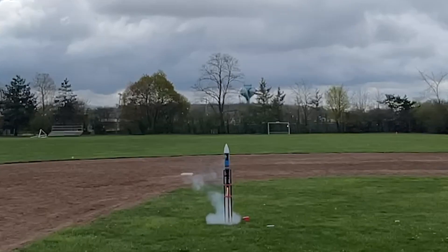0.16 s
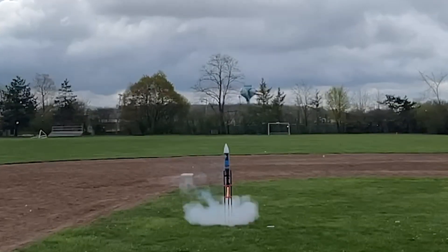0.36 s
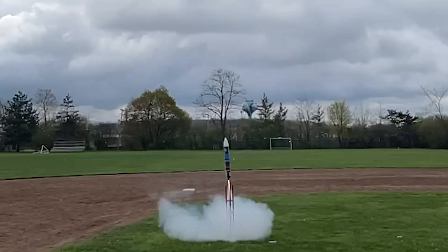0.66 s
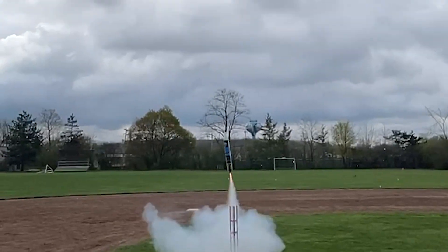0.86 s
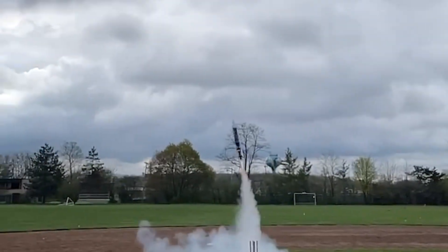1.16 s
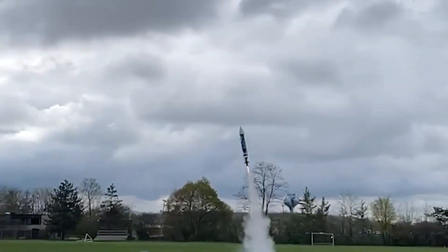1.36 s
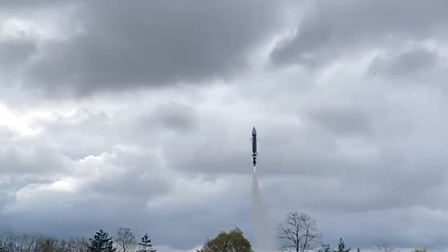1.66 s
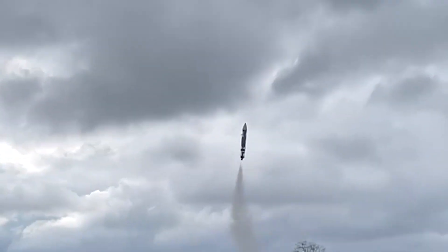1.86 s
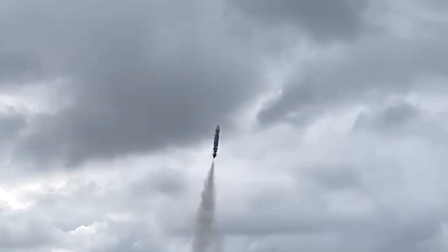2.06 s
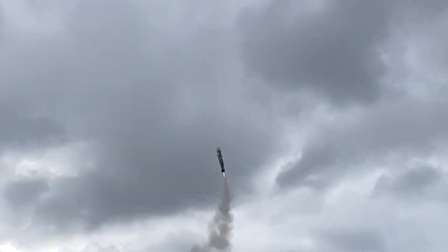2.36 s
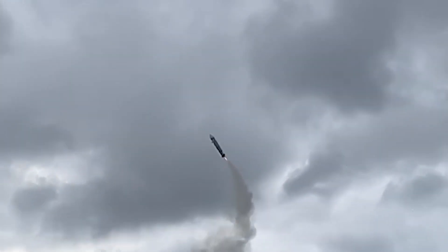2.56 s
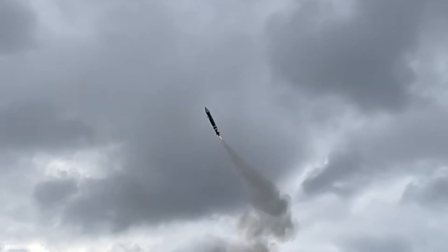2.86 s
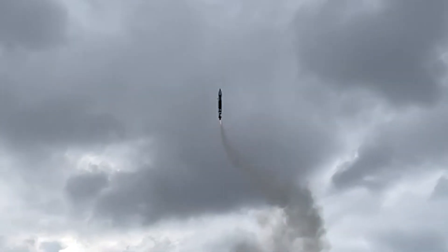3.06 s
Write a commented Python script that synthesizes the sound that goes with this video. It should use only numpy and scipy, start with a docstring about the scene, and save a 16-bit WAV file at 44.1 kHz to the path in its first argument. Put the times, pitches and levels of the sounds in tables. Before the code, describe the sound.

A small solid-fuel rocket lights with a fierce rushing hiss on a grass field, drops back as it lifts off, swells again overhead with sharp crackling pops, then fades; handheld stereo camera, faint low wind rumble.

```python
"""A small solid-fuel rocket lights on its pad in an open field, roars up and burns out overhead.
The jet is turbulent hiss, shaped in bands, over shared crackle; uneven burning adds sharp pops.
The grass sends back a dull echo whose lag grows from under a millisecond to about six.
Wind noise rumbles on the two microphone ports of a handheld camera; a few low thuds,
some of them the bass tails of pops, sound alike on both."""
import sys
import numpy as np
from scipy import signal
from scipy.fft import rfft, irfft
from scipy.io import wavfile
from scipy.ndimage import uniform_filter1d

SR = 44100
rng = np.random.default_rng(int(sys.argv[2]) if len(sys.argv) > 2 else 0)


def put_to_file(sound):
    """Save the sound as 16-bit audio at rate SR, in the file named by the first command-line argument."""
    columns = np.atleast_2d(sound).T  # one column per channel
    safe = np.clip(columns, -1, 1)
    whole_steps = np.round(safe * 32767)
    wavfile.write(sys.argv[1], SR, whole_steps.astype(np.int16))


def gain_from_db(level_db):
    """Convert decibel levels to linear amplitude factors (20 dB per decade)."""
    decades = np.asarray(level_db, float) / 20
    return 10 ** decades


N = 141120  # samples
T = np.arange(N) / SR  # s
HZ = np.fft.rfftfreq(512, 1 / SR)  # bins of the short-time spectra


def evened(x):
    """Scales to rms 1."""
    return x / np.sqrt(np.mean(x ** 2) + 1e-20)


def read(points, hz):
    """Reads a table on a log-frequency axis."""
    f, value = np.transpose(points)
    return np.interp(np.log(hz + 1), np.log(f + 1), value)


def frames(x):
    """Frame times and short-time spectra."""
    return signal.stft(x, SR, nperseg=512, noverlap=384)[1:]


def sound(z):
    """Back from short-time spectra to samples."""
    return signal.istft(z, SR, nperseg=512, noverlap=384)[1][..., :N]


def drift(hz):
    """Random wander with rms 1, up to about hz."""
    spectrum = rfft(rng.standard_normal(N))
    return evened(irfft(spectrum / (1 + (np.fft.rfftfreq(N, 1 / SR) / hz) ** 2), N))


def band(x, low_hz, high_hz):
    """Gentle band-pass."""
    return signal.sosfilt(signal.butter(2, [low_hz, high_hz], "band", fs=SR, output="sos"), x)


def wind():
    """Light wind on the ports: a lumpy low band of noise, mostly shared by the two."""
    # strength of the wind rumble: (time [s], level [dB])
    strength = [(0, -63), (.06, -54), (.22, -59), (.42, -71), (.95, -82), (1.8, -80), (2.04, -65),
                (2.5, -70), (3.2, -78)]
    low_hz, high_hz = 45, 95
    lumpy_db = 2.5  # rms of the level wander
    same = .93  # likeness of the two ports
    noise = band(rng.standard_normal((2, N)), low_hz, high_hz)
    a, b = band(noise, low_hz / 2, 2 * high_hz)
    pair = np.array([a, same * a + np.sqrt(1 - same ** 2) * b])
    rumble = evened(gain_from_db(lumpy_db * drift(26.0)) * pair)
    return rumble * gain_from_db(np.interp(T, *np.transpose(strength)))


def thuds():
    """Dull low thuds, some the bass tails of pops, alike on both ports: a tone that swells and dies away."""
    # thuds: (time [s], peak level of the envelope [dB])
    hits = [(0.046, -46.5), (1.07, -58), (2.597, -49), (2.634, -54), (3.006, -51), (3.157, -58),
            (3.18, -52)]
    rise_s, tone_hz = .006, 150
    out = np.zeros(N)
    for s, db in hits:
        u = np.maximum(T - s, 0)
        envelope = u / rise_s * np.exp(1 - u / rise_s)
        out += gain_from_db(db) * envelope * np.sin(2 * np.pi * tone_hz * u)
    return out


def ground(x):
    """Adds the dull echo off the grass, whose extra path changes as the rocket climbs."""
    # extra path by way of the ground, smoothed below: (time [s], lag [ms])
    path = [(0, 0.72), (.55, 0.63), (.95, 1.34), (1.42, 2.49), (1.65, 3.13), (2.0, 4.03), (2.3, 4.84),
            (2.58, 5.87), (2.93, 5.84), (3.2, 6.1)]
    grass_db, grass_hz = -5, 2200  # echo level, and corner of its treble loss
    s, ms = np.transpose(path)
    lag_ms = uniform_filter1d(np.interp(T, s, ms), size=4000)
    late = np.arange(N) - lag_ms * SR / 1000
    dull = signal.filtfilt(*signal.butter(1, grass_hz, fs=SR), x)
    return x + gain_from_db(grass_db) * np.array([np.interp(late, np.arange(N), v) for v in dull])


def ports(pair):
    """The camera turns the arriving sound into left and right, by body colour, phase, likeness and balance."""
    # likeness of the two ports: (frequency [Hz], likeness [0 to 1])
    likeness = [(60, .97), (1000, .96), (1300, .995), (1950, .995), (2300, .7), (4500, .7), (4800, .92),
                (7000, .84), (8300, .995), (10200, .995), (10800, .9), (12500, .87)]
    # left minus right with the rocket low and high: (frequency [Hz], level difference [dB])
    side_low = [(60, -9), (250, 6.5), (400, -9), (560, 4.5), (950, -7), (1250, -0.5), (2000, 0), (2200, 13),
                (2400, 0), (2900, -6.5), (3100, 54), (3400, 10), (3750, -7), (4600, 4), (5600, 4),
                (7000, 0)]
    side_high = [(60, 4), (250, 5), (400, -2.5), (560, 5), (900, -10), (1300, 2), (2400, -7), (2750, 11.5),
                 (3400, -8), (4000, -7.5), (4400, -13), (4600, -0.5), (8000, 0.5)]
    # pickup of the camera body with the rocket low and high: (frequency [Hz], gain [dB])
    body_low = [(100, -10.5), (170, 3.5), (250, 4), (370, -8.5), (700, 4), (1100, 1.5), (1550, 1),
                (1850, 0), (2300, -2), (2700, 1), (2950, 0), (3500, -2), (4050, -0.5), (4250, 4.5),
                (4600, -6.5), (5000, -1.5)]
    body_high = [(200, -1), (380, -7), (550, -3), (1500, -1), (2100, -1), (2550, 3.5), (3120, -1.5),
                 (3300, 1.5), (3550, -4), (3950, 1.5), (4550, 2), (5200, -2.5)]
    # right minus left with the rocket low and high: (frequency [Hz], phase [rad])
    turn_low = [(60, 0), (350, .9), (450, .2), (700, 1), (1250, 0), (2000, 0), (2250, 1.4), (2450, .6),
                (3000, 2.8), (3550, 6.3), (4000, 5.2), (4350, 7), (4650, 6.3)]
    turn_high = [(60, 0), (350, .5), (450, .3), (750, 1.1), (950, 0), (2150, 0), (2600, 2.6), (3050, 1),
                 (3400, 2.8), (3650, 6), (4050, 7), (4400, 9.4), (4700, 12.1)]
    lift_s, swing_s = .75, 1.9  # the direction moves from low to high between these times
    port_lag_s = .0001085
    t, (a, b) = frames(pair)
    same = np.clip(read(likeness, HZ), 0, 1)[:, None]
    up = np.clip((t - lift_s) / (swing_s - lift_s), 0, 1)

    def blend(low, high):
        """Moves from the low-rocket table to the high one."""
        return np.outer(read(low, HZ), 1 - up) + np.outer(read(high, HZ), up)

    # above the last row of turn_low the right port is inverted and late
    inverted_late = np.pi - 2 * np.pi * HZ[:, None] * port_lag_s
    turn = np.where(HZ[:, None] < turn_low[-1][0], blend(turn_low, turn_high), inverted_late)
    lean = gain_from_db(blend(side_low, side_high) / 2)
    # the balance leaves the mean power of the two gains alone
    balance = np.array([lean, 1 / lean]) / np.sqrt((lean ** 2 + lean ** -2) / 2)
    right = (same * a + np.sqrt(1 - same ** 2) * b) * np.exp(1j * turn)
    return sound(gain_from_db(blend(body_low, body_high)) * balance * np.array([a, right]))


def pops():
    """Uneven burning: each pop is a suction and pressure jump with its bass trailing; longer ones are duller."""
    # pops at the source: (time [s], peak level [dB], time scale [ms])
    bursts = [(.227, -26, .1), (1.069, -36, .12), (1.191, -37, .3), (2.0156, -27, .35), (2.122, -26, .11),
              (2.443, -19, .075), (2.476, -24, .1), (2.507, -28.5, .25), (2.596, -35, .2), (2.63, -29, .22),
              (2.684, -35, .08), (2.85, -38, .35), (2.857, -35, .12), (2.941, -34, .2), (2.987, -37, .14),
              (3.005, -36, .13)]
    low_hz, high_hz, trail_cycles = 140, 3000, .9
    length = 900  # samples
    out = np.zeros(N + length)
    hz = np.maximum(np.fft.rfftfreq(length, 1 / SR) / high_hz, 1e-2)  # relative to high_hz
    # delays low frequencies by about trail_cycles of their own period
    trail = np.exp(-2j * np.pi * trail_cycles * (np.log(hz) - hz))
    for s, db, ms in bursts:
        u = np.arange(length) / SR / ms * 1000
        jump = band((u - 1) * np.exp(-u), low_hz, high_hz)
        jump = band(jump, low_hz, 2 * high_hz)
        shape = irfft(rfft(jump) * trail, length)
        out[round(s * SR):][:length] += gain_from_db(db) * shape / abs(shape).max()
    return out[:N]


def jet():
    """Two unrelated draws of turbulence over shared crackle, shaped by colour, band levels and patches."""
    # jet as the nozzle swings, before echo and ports: (time [s], level [dB], then each band
    # against that level: low roar [dB], roar [dB], rush [dB], hiss [dB], sizzle [dB])
    course = [(0, -54, 1, -4.5, -1, -2.5, -13), (.13, -37.5, -14.5, -6, -3.5, -1, -6),
              (.24, -29.5, -15.5, -5, -5, -1, -4.5), (.36, -28.5, -19.5, -7.5, -4.5, -3, -6.5),
              (.53, -34, -15, -7.5, -1, 2, -5), (.58, -31, -18, -7, -7, -2.5, 0.5),
              (.63, -29, -23.5, -13.5, -6.5, 1.5, -14), (.642, -37.5, -16, -7, -2.5, 3.5, -6),
              (.69, -42, -11.5, -5.5, 1.5, 3.5, -3.5), (.8, -42, -15.5, -7, -3.5, -3.5, -4.5),
              (1.2, -41, -13.5, -6.5, -4, -2.5, -2.5), (1.58, -39.5, -15, -7, -3.5, -3.5, -4),
              (1.91, -34.5, -18, -11, -5, -2.5, 0.5), (2.05, -32, -18, -12.5, -3, -2, -1.5),
              (2.2, -31, -20.5, -9, -4, -1, -6), (2.33, -30.5, -20.5, -7.5, -2, -6, -11),
              (2.47, -31.5, -14.5, -5, -2, -5.5, -11), (2.56, -37.5, -14, -3, 0, -4.5, -6.5),
              (2.83, -35.5, -22, -8.5, -2, -0.5, -4), (2.9, -39, -22, -10.5, -3, -0.5, -2),
              (2.96, -45, -10.5, -11, -2, 0, -2.5), (3.06, -48.5, -12, -5, -5.5, -3, -6),
              (3.2, -49.5, -11, -5, -5, -8, -5)]
    # the five bands: (low edge [Hz], high edge [Hz])
    bands = [(250, 1000), (1000, 2500), (2500, 4500), (4500, 8000), (10000, 16000)]
    # colour of the jet: (frequency [Hz], spectral density [dB per Hz]), then set band by band to the levels
    tint = [(30, -52), (100, -18), (300, -12.5), (600, -5.5), (1000, -8), (1600, -2.5), (2700, -1.5),
            (4600, -4), (5600, 1), (7500, -4.5), (9700, -8.5), (11500, -3.5), (13200, -13.5),
            (16000, -18.5)]
    crackle_per_s, crackle_spread_db, crackle_db = 300, 4.0, -15  # crackle_db: rms against the hiss
    flutter_db, flutter_hz = .8, 135.0
    surge_db, surge_hz, pad_s = .7, 22, .62  # the blast surges while it still hits the pad
    patchy_db = 1.3  # rms of the patches in time and frequency

    strength = gain_from_db(crackle_spread_db * np.minimum(rng.exponential(1, N), 4))
    crackle = strength * (rng.random(N) < crackle_per_s / SR)
    flutter = flutter_db * drift(flutter_hz)
    surge = surge_db * (T < pad_s) * drift(surge_hz)
    gusts = gain_from_db(flutter + surge)
    gusts = gusts / np.sqrt(np.mean(gusts ** 2))
    hiss = rng.standard_normal((2, N))
    t, z = frames(gusts * (hiss + gain_from_db(crackle_db) * evened(crackle)))

    rows, colour = np.array(course), gain_from_db(read(tint, HZ))
    levels, centres = [], []
    for k, (lo, hi) in enumerate(bands):
        share = 10 * np.log10(np.mean(colour ** 2 * (HZ > lo) * (HZ < hi)))  # what the colour alone gives
        levels.append(np.interp(t, rows[:, 0], rows[:, 1] + rows[:, 2 + k]) - share)
        centres.append(np.sqrt(lo * hi))
    # each frequency bin blends the levels of its neighbouring bands
    weights = np.array([read(list(zip(centres, one)), HZ) for one in np.eye(len(bands))])
    patches = uniform_filter1d(rng.standard_normal(z.shape[1:]), size=6, axis=0)
    patches = evened(uniform_filter1d(patches, size=20, axis=1))
    return sound(z * colour[:, None] * gain_from_db(weights.T @ np.array(levels) + patchy_db * patches))


def scene():
    """Jet and pops over the grass into the ports, plus wind and thuds."""
    return ports(ground(jet() + pops())) + wind() + thuds()


def top_cut(x):
    """Nothing passes above the cut-off."""
    return signal.sosfilt(signal.butter(12, 16480, fs=SR, output="sos"), x)


def record(dry):
    """The camera's upper band limit: a steep linear-phase low-pass."""
    edge_hz = 15750
    low_pass = signal.firwin(511, edge_hz, window=("kaiser", 9), fs=SR)
    mix = signal.oaconvolve(dry, low_pass[None], "same")
    return top_cut(mix)


dry = scene()
out = record(dry)
put_to_file(out)
```